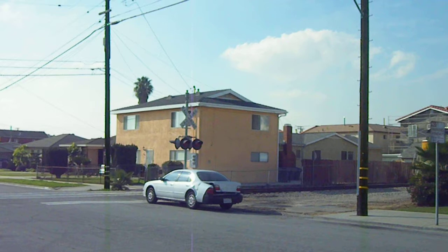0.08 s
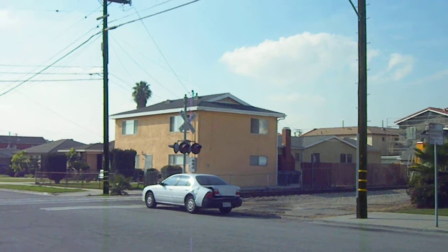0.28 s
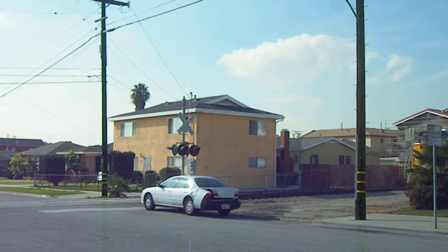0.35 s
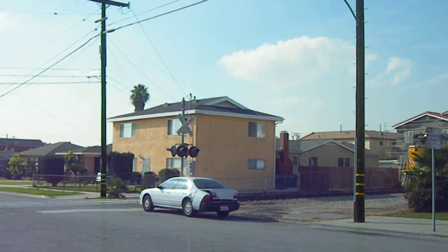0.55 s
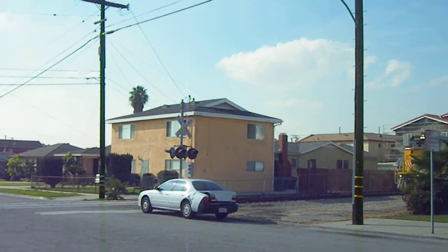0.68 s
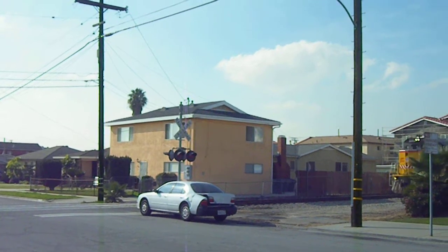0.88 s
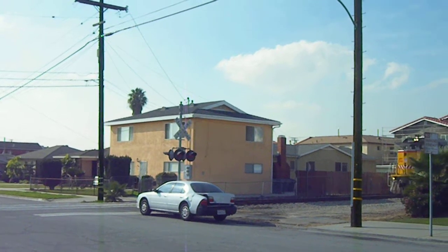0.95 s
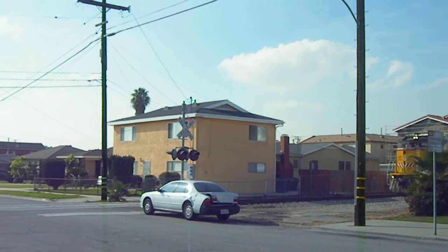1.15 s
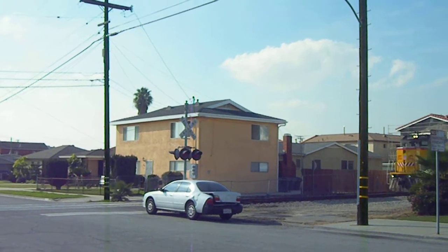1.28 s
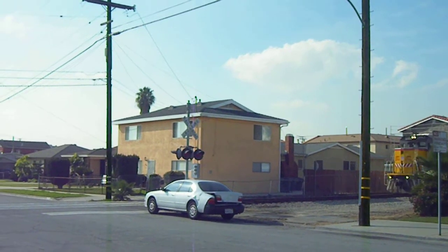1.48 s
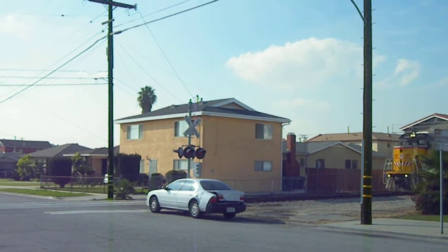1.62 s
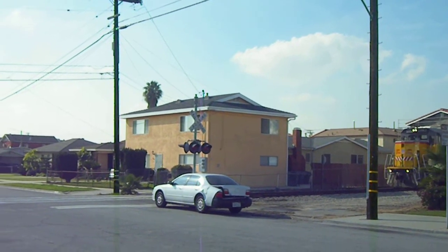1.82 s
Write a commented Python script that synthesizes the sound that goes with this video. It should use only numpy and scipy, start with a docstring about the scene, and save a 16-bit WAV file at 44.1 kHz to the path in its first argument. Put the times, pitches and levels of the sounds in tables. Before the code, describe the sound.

A diesel locomotive drones quietly over a rush of wheels and fans in a residential street. Loud, close clicks and scrapes of fingers on the camera come as it fades in, then a few more and a creak.

```python
"""A diesel freight locomotive drones as it creeps toward a crossing in a quiet street, over a wash of
wheels and fans. The drone is a few wavering tones; the wash is shaped noise. The street fades in over
the hiss of a small camera that loses the high treble. Fingers click, knock, scrape and creak on its
case, making the plastic ring, and the hardest contacts overload it."""
import sys
import numpy as np
from scipy import signal
from scipy.fft import rfft, irfft
from scipy.io import wavfile
from scipy.ndimage import uniform_filter1d

SR = 44100
rng = np.random.default_rng(int(sys.argv[2]) if len(sys.argv) > 2 else 0)


def transcribe(signal):
    """Save signal, clipped to [-1, 1], as a 16-bit WAV file at the path in sys.argv[1]."""
    frames = np.atleast_2d(signal).T
    limited = np.clip(frames, -1, 1)
    pcm = np.round(limited * 32767).astype(np.int16)
    wavfile.write(sys.argv[1], SR, pcm)


N = 81585
T = np.arange(N) / SR

# The tones of the camera case. Each row: pitch in Hz, relative level in dB, ring time in seconds.
# A ring time (t60) is how long a tone takes to fade by 60 dB.
CASE_TONES = [(330, -7, 0.016), (693, 5.5, 0.02), (1615, -10, 0.0065)]


def locomotive():
    """The diesel's steady firing makes a drone of wavering tones; the train also whines briefly."""
    # Each row: multiple of the firing rate, average level in dB.
    engine_tones = [(3, -60.5), (4, -56), (7, -62), (8, -51.5), (9, -52), (11, -56.5), (18, -60)]
    firing_hz, waver_db = 39.7, 3
    firings = np.cumsum(firing_hz * (1 + .0042 * drift(7.73))) / SR
    drone = 0
    for multiple, db in engine_tones:
        tone = np.sin(2 * np.pi * (multiple * firings + rng.random()))
        drone += level(tone * undb(waver_db * drift(10.2)), db)
    whine = level(np.sin(2 * np.pi * 726 * T), db=-40) * swell(at=.752, spread_s=.018)
    return drone + whine


def wheels_and_fans():
    """Wheels, fans and distant traffic blend into a flickering rush; the rails sing in a narrow band."""
    # Each row: frequency in Hz, relative level in dB.
    rush_spectrum = [(30, -29.5), (80, -24), (130, -9.5), (190, 0.5), (300, 0), (400, -5.5), (580, -4),
                     (900, -12), (1080, -9.5), (1380, -17), (1750, -11), (2050, -10.5), (2500, -10.5),
                     (3200, -18), (4000, -21)]
    steady, rush = noise(rush_spectrum), 0
    for octave in range(9):  # each octave flickers on its own
        band = shaped(steady, lambda f: np.maximum(1 - np.abs(np.log2(f / 30) - octave), 0))
        rush += band * undb(.5 * drift(21.62))
    rail_hz, half_width_hz = 1740, 135
    rails = shaped(rng.standard_normal(N), lambda f: 1 / (1 + ((f - rail_hz) / half_width_hz) ** 2))
    rails *= undb(1.5 * drift(19.8))
    return level(rush, db=-39.5) + level(rails, db=-50.5)


def rumble():
    """The rolling train gives one short, low swell of noise."""
    # Each row: frequency in Hz, relative level in dB.
    rumble_spectrum = [(60, -27), (170, -3), (300, -5.5), (700, -9.5), (1400, -31), (4000, -23.5)]
    return level(noise(rumble_spectrum), db=-36.5) * swell(at=.816, spread_s=.037)


def clicks():
    """Each hard contact on the plastic makes a bright tick and a weak ring of the case."""
    # Each row: start in seconds, peak level in dB, pitch in Hz, ring time in seconds.
    contacts = [(0.2125, -22.5, 2770, 0.0025), (0.2176, -4.5, 2560, 0.0027), (0.2209, -5, 3300, 0.0024),
                (0.2224, -9, 1870, 0.0026), (.2252, -27, 3300, .003), (0.2558, -12, 2500, 0.0024),
                (0.258, -7.5, 3130, 0.0027), (0.259, -10, 3000, 0.0015), (0.2989, -13, 2770, 0.0025),
                (0.3081, -6, 2390, 0.0038), (0.31, -14.5, 2300, .003), (0.3208, -12, 2620, 0.0042),
                (0.3244, -5, 2700, .0025), (0.3307, -2.5, 2450, 0.0032), (0.3369, -.5, 2900, 0.0037),
                (0.3411, -4.5, 2800, 0.0043), (1.0632, -26.5, 3000, 0.0079), (1.1272, -15.5, 1770, 0.0044),
                (1.1289, -21, 1750, 0.011)]
    return sum(peak(tick(start, hz, t60), db) + peak(strike(start, CASE_TONES), db - 29)
               for start, db, hz, t60 in contacts)


def knocks():
    """A soft fingertip pushes for longer, so the case rings low and dull."""
    # Each row: start in seconds, peak level in dB, pitch in Hz, ring time in seconds.
    taps = [(0.2224, -12, 474, 0.0065), (.2579, -5, 370, 0.0081), (0.3093, -19.5, 404, 0.0065),
            (.3150, -21.5, 340, 0.021), (0.7998, -22.5, 279, 0.067), (1.1274, -20.5, 740, .004),
            (1.1282, -23.5, 250, 0.01)]
    push = swell(at=T[200], spread_s=.0001875)[:400]
    out = 0
    for start, db, hz, t60 in taps:
        movement = signal.fftconvolve(-ring(start, hz, t60), push, "same")
        out += peak(np.gradient(movement), db)
    return out


def scrapes():
    """A finger sticks and slips over the case, making a fast run of uneven ticks."""
    # Each row: start in seconds, end in seconds, average level in dB, pitch in Hz.
    strokes = [(.313, 0.336, -20.5, 2150), (.284, .304, -45, 3000), (1.066, 1.07, -36, 1700)]
    slips_per_s, scatter_db = 990, 2.5
    out = 0
    for start, end, db, hz in strokes:
        gap_luck, force_luck = rng.standard_normal((80, 2)).T
        times = start + np.cumsum(np.exp(.43 * gap_luck)) / slips_per_s
        forces = undb(scatter_db * force_luck) * (times < end)
        slips = np.bincount((times * SR).astype(int), forces, N)[:N]
        one_slip = tick(0, hz, t60=.0033) + undb(-27.5) * strike(0, CASE_TONES)
        rub = signal.fftconvolve(slips, one_slip)[:N]
        out += level(rub, db) * np.sqrt((end - start) / (N / SR))  # average over the stroke only
    return out


def creak():
    """The plastic gives twice in quick succession, harder the second time."""
    # Each row: pitch in Hz, relative level in dB, ring time in seconds.
    plastic_tones = [(1470, -6.5, 0.038), (2140, 9.5, 0.014), (2800, -11.5, 0.016)]
    start_s, gap_s = 1.074, .002136
    return peak(.5 * strike(start_s, plastic_tones) + strike(start_s + gap_s, plastic_tones), db=-14.5)


def camera_noise():
    """The camera adds its own steady hiss and a faint low hum."""
    # Each row: frequency in Hz, relative level in dB.
    hiss_spectrum = [(30, -3.5), (200, 10), (450, -2), (1200, -4.5), (2500, -5), (4000, -7.5)]
    return level(noise(hiss_spectrum), db=-47) + level(np.sin(2 * np.pi * 60 * T), db=-65.5)


def ring(start, hz, t60):
    """One tone of a struck object, dying away."""
    age = np.maximum(T - start, 0)
    return np.sin(2 * np.pi * hz * age) * np.exp(-np.minimum(np.log(1000) * age / t60, 60))


def tick(start, hz, t60):
    """The speed of a ringing surface: it gives off little sound below its pitch."""
    return np.gradient(ring(start, hz, t60)) * SR / (2 * np.pi * hz)


def strike(start, tones):
    """Several tones set ringing at once."""
    return sum(undb(db) * tick(start, hz, t60) for hz, db, t60 in tones)


def undb(db):
    """Turn decibels into a multiplier."""
    return 10 ** (np.asarray(db) / 20)


def level(x, db):
    """Set the average (rms) level."""
    return x * undb(db) / np.sqrt(np.mean(x ** 2))


def peak(x, db):
    """Set the peak level."""
    return x * undb(db) / np.max(np.abs(x))


def swell(at, spread_s):
    """A bell-shaped rise and fall."""
    return np.exp(-.5 * ((T - at) / spread_s) ** 2)


def drift(per_second):
    """A smooth random wander, roughly 1 either side of zero."""
    hold = int(SR / per_second)
    steps = np.repeat(rng.standard_normal(400), hold)[:N]
    return 1.3 * uniform_filter1d(uniform_filter1d(steps, hold), hold)


def shaped(x, gain):
    """Multiply each frequency f in a sound by gain(f)."""
    hz = np.arange(N + 1) * SR / (2 * N) + 1e-6
    return irfft(rfft(x, 2 * N) * gain(hz))[:N]


def noise(spectrum):
    """Noise whose tone follows rows of Hz and dB."""
    hz, db = np.array(spectrum).T
    return shaped(rng.standard_normal(N), lambda f: undb(np.interp(np.log(f), np.log(hz), db)))


def scene():
    """The train and street fade in, joined by finger sounds and the camera's noise."""
    # Each row: time in seconds, street volume in dB (0 is full).
    fade_in = [(.15, -18.5), (.2, -9), (.28, -2), (.37, -0.5), (.45, 0), (1.85, 0)]
    times, db = np.array(fade_in).T
    street = (wheels_and_fans() + locomotive() + rumble()) * undb(np.interp(T, times, db))
    background = camera_noise()
    return (street + clicks() + knocks() + scrapes() + creak() + background)[None]


def record(dry):
    """The camera switches on, loses deep bass and high treble, and flattens the tallest peaks."""
    on_s, peak_limit = .022, .68
    bass_hz, treble_hz, rolloff_hz, top_hz = 77, 3614, 314, 15900
    bass_cut = signal.butter(1, bass_hz, "high", fs=SR, output="sos")
    thin = signal.sosfilt(bass_cut, dry[0] * (T > on_s))
    narrow = shaped(thin, lambda f: np.exp(-.5 * (np.maximum(f - treble_hz, 0) / rolloff_hz) ** 2))
    overloaded = np.clip(narrow, -peak_limit, peak_limit)
    top_cut = signal.ellip(8, .2, 70, top_hz, fs=SR, output="sos")
    return signal.sosfilt(top_cut, overloaded)[None]


dry = scene()
out = record(dry)
transcribe(out)
```